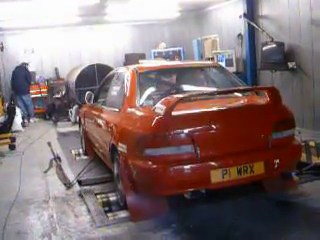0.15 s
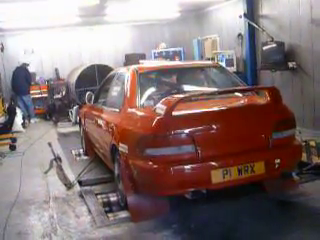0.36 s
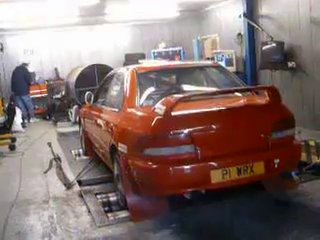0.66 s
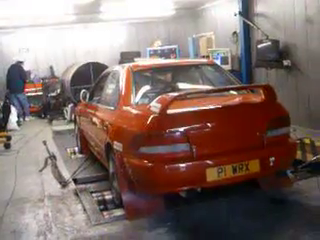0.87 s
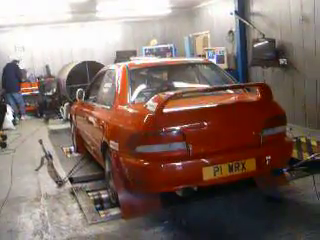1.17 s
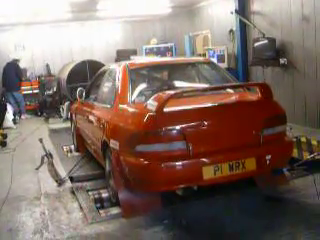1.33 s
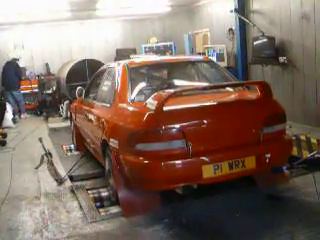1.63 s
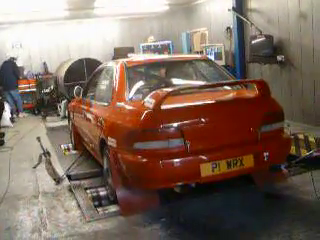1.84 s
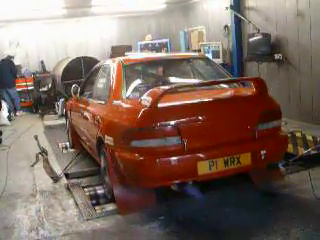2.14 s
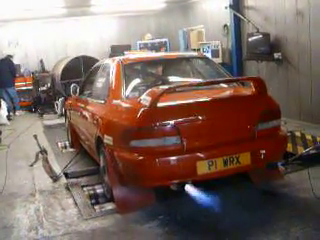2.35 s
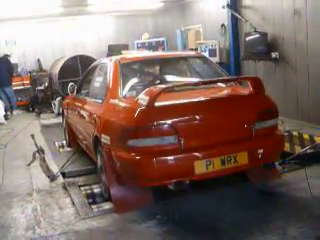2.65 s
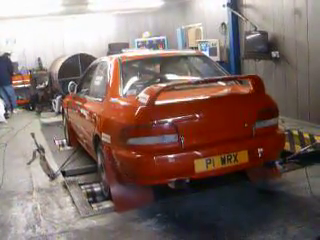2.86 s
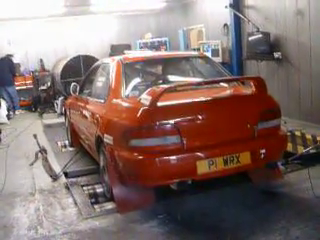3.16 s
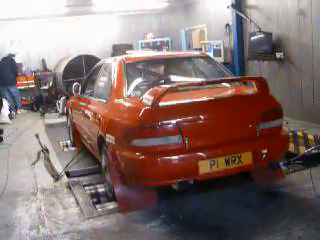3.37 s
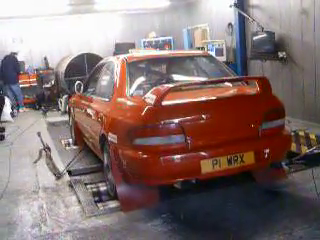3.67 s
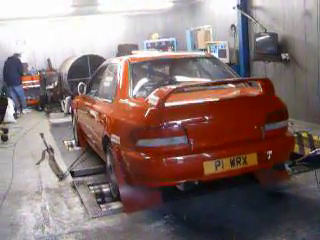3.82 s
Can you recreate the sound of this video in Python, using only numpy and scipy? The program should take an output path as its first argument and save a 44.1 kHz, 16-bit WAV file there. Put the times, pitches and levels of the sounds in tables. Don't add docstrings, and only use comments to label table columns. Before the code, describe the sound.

Car exhaust heard a few metres behind: a lumpy, raspy pull grows louder and higher, stops abruptly into loud backfires and low buffeting, then the engine picks up again over faint fan and roller hiss; small bass-light camera microphone.

```python
import sys
import numpy as np
from scipy import signal
from scipy.fft import rfft, irfft
from scipy.io import wavfile
from scipy.ndimage import uniform_filter1d

SR = 44100
rng = np.random.default_rng(int(sys.argv[2]) if len(sys.argv) > 2 else 0)


def persist_wave(psi):
    counts = np.round(np.clip(psi, -1, 1) * 32767).astype(np.int16)
    wavfile.write(sys.argv[1], SR, np.atleast_2d(counts).T)


def magnitude_from_level(level_db):
    exponent = np.asarray(level_db, float) / 20
    return 10 ** exponent


N = 176400


def curve(t, table, column=1):
    points = np.array(table).T
    return np.interp(t, points[0], points[column])


def band(x, hz, width):
    return signal.lfilter(*signal.iirpeak(hz, hz / width, fs=SR), x)


def double_band(x, hz, width):
    return band(band(x, hz, width), hz, width)


def bank(x, table):
    return sum(magnitude_from_level(db) * band(x, hz, width) for hz, width, db in table)


def band_pass(x, order, edges_hz):
    return signal.sosfilt(signal.butter(order, edges_hz, "band", fs=SR, output="sos"), x)


def unit(x):
    return x / np.sqrt(np.mean(x ** 2))


def colour(table):
    f = np.arange(N // 2 + 1) * SR / N + 1
    hz, db = np.array(table).T
    shape = magnitude_from_level(np.interp(np.log(f), np.log(hz), db))
    return unit(irfft(rfft(rng.standard_normal(N)) * shape, N))


def walk(rate):
    k = int(SR / rate)
    return unit(uniform_filter1d(uniform_filter1d(rng.standard_normal(N), k), k))


def clicks(at, size):
    out = np.zeros(N + 2)
    i = np.clip(at * SR, 0, N - 1)
    np.add.at(out, i.astype(int), size * (1 - i % 1))
    np.add.at(out, i.astype(int) + 1, size * (i % 1))
    return out[:N]


# (time [s], shut [0-1])
THROTTLE = [
    (1.84, 0),
    (1.88, 1),
    (3.14, 1),
    (3.2, 0),
]


def throttle_shut(t):
    return curve(t, THROTTLE)


# (time [s], engine cycles [1/s])
SPEED = [(0, 31.8), (.15, 31.6), (.3, 31.9), (1.1, 34.5), (1.66, 36.75), (1.76, 37.1), (1.85, 36.6),
         (2.3, 34.9), (3.2, 30.3), (3.45, 29.98), (3.6, 30.2), (4, 31.35)]
CYCLE_START = 1.638


def crank(t):
    speed = curve(t, SPEED)
    cycles = np.cumsum(speed) / SR
    return speed, 4 * (cycles - cycles[int(CYCLE_START * SR)] % 1)


# (full load [dB], late [ms], part load [dB], late [ms], gas rasp [dB])
CYLINDERS = [(4.5, -0.026, -1.5, -0.033, 6.5), (5, -0.386, 0.5, -0.64, -2), (-1, -0.824, -15, -0.42, -3.5),
             (4.7, 0.037, -4.5, 0.245, -1)]
# (level [dB], late [ms], gas rasp [dB])
EARLY = [(2.6, 0.035, -0.5), (3, -0.0011, 5.5), (3.5, -0.369, -6), (0, -0.78, -4)]
# [time [s], time [s]]
BOOST = [1.02, 1.2]
PART_LOAD_S = 2.0
SCATTER_DB, JITTER_MS = .8, .025


def firings(t, turns):
    k = np.arange(int(turns[-1]))
    jitter, scatter, rasp_scatter = rng.standard_normal((len(k), 3)).T
    at = np.interp(k, turns, t)
    part = at > PART_LOAD_S
    boost = np.interp(at, BOOST, [0, 1])
    c = (k + 2 * part) % 4
    full_db, full_ms, part_db, part_ms, rasp = np.array(CYLINDERS).T[:, c]
    early = np.array(EARLY).T[:, c]
    size_db, late_ms, rasp_db = (1 - boost) * early + boost * np.array([full_db, full_ms, rasp])
    at = at + (np.where(part, part_ms, late_ms) + JITTER_MS * jitter) / 1000
    size_db = np.where(part, part_db, size_db) + SCATTER_DB * scatter
    return at, size_db, rasp_db + 1.2 * rasp_scatter


# (frequency [Hz], width [Hz], level [dB])
PIPE = [(177, 96, -5), (221, 126, -21), (230, 49, -8), (289.6, 58.5, -6.5), (436, 25, -9), (556, 125, -6.5)]
TAIL_PIPE = [(754, 17, -7), (765.4, 43.2, 2), (821, 15, -16)]
# (frequency [Hz], width [Hz], level [dB], rise per cycle/s of speed [dB])
TAIL_BOX = [(1183.5, 62, -21.5, 0.9), (1358, 34, -18, -0.1), (1541, 144, -18, 0.2), (1578.6, 46, -17, -1.5),
            (1800, 214, -24, 1.2), (2295, 108, -20.5, 0.3), (2912, 110, -20, -2.2), (3247, 117, -18, -0.46)]
MID_SPEED = 33
PIPE_BAND_HZ, PART_PIPE_DB = [82, 830], -6.5


def exhaust_note(t, speed, pulses, sharp):
    into_pipe = pulses * magnitude_from_level(PART_PIPE_DB * (t > PART_LOAD_S))
    note = band_pass(bank(into_pipe, PIPE) + bank(sharp, TAIL_PIPE), 6, PIPE_BAND_HZ)
    for hz, width, db, rise in TAIL_BOX:
        note = note + magnitude_from_level(db + rise * (speed - MID_SPEED)) * double_band(sharp, hz, width)
    return unit(note)


# (frequency [Hz], level per Hz [dB])
GAS = [(500, 2), (900, 1), (1300, -19), (1580, 6.5), (2000, -18), (3150, 0), (4000, -22.5), (7800, -16),
       (10500, -24)]
# [low [Hz], high [Hz]]
REPEAT_BAND = [1300, 5000]
PUFF_LEAD_S, PUFF_SHARE, PUFF_DEPTH = .0014, .17, .6
REPEAT_DB, HISS_DB = -4, -3


def gas_rasp(t, at, rasp_db):
    valves = clicks(at - PUFF_LEAD_S, magnitude_from_level(rasp_db))
    noise = colour(GAS)
    u = np.arange(441) / 441 / PUFF_SHARE
    swell = u * np.exp(-2 * u)
    puff = signal.fftconvolve(valves, swell)[:N]
    repeat = signal.fftconvolve(valves, noise[:441] * swell)[:N]
    pulling = 1 - throttle_shut(t)
    depth = PUFF_DEPTH * pulling
    hiss = unit(noise * (1 - depth + depth * unit(puff)) * magnitude_from_level(.7 * walk(9)))
    return magnitude_from_level(HISS_DB) * hiss + magnitude_from_level(REPEAT_DB) * pulling * unit(band_pass(repeat, 2, REPEAT_BAND))


# (multiple of cycle rate, level over the firing [dB], lag [turns of the tone])
DRONE = [(5, -8.5, .05), (7, -18.5, .3), (8, -14, 0.64), (13, -22, 0.22), (17, -21, 0.72)]
DRONE_FROM_S, DRONE_RISE_S = 3.2, 0.047


def pull_drone(t, turns):
    tones = sum(magnitude_from_level(db) * np.sin(2 * np.pi * (order * turns / 4 - lag)) for order, db, lag in DRONE)
    return tones * np.clip((t - DRONE_FROM_S) / DRONE_RISE_S, 0, 1)


# (time [s], firing level [dB], blow-down sharpness [dB], gas level [dB])
LOAD = [(0, -26, 4, -24.5), (.13, -25, 2.2, -21.5), (.27, -21.5, 3.5, -20.5), (.7, -16, 3, -12),
        (1.18, -14.5, 1, -14), (1.4, -15.5, 0, -15), (1.8, -19, 4, -19), (1.843, -31.5, 13, -13.5),
        (1.872, -47.5, 10.5, -23.5), (1.98, -36.5, 5.5, -23.5), (2.2, -34, -5, -52), (2.56, -43, 10, -42),
        (2.68, -37.5, 8, -34), (3.12, -41.5, 7, -36), (3.16, -23, -7, -23), (3.27, -26.5, 3.5, -32.5),
        (3.65, -20.5, 3, -27), (4, -17.5, 0.7, -23.5)]
GAS_DB = -11.5


def engine(t):
    speed, turns = crank(t)
    at, size_db, rasp_db = firings(t, turns)
    pulses = clicks(at, magnitude_from_level(size_db))
    sharp = pulses * magnitude_from_level(curve(t, LOAD, 2))
    tone = exhaust_note(t, speed, pulses, sharp) + pull_drone(t, turns)
    gas = gas_rasp(t, at, rasp_db)
    return tone * magnitude_from_level(curve(t, LOAD, 1)) + gas * magnitude_from_level(GAS_DB + curve(t, LOAD, 3))


# (late [s], level [dB])
ECHOES = [(.0105, -23.5), (.0135, -29), (0.022, -23.5), (.031, -33.5)]
ROOM_T60_S, ROOM_DB, ROOM_HZ, ROOM_RISE_S = .14, -14, 5000, 0.0074


def room(x):
    u = np.arange(SR // 2) / SR
    late, db = np.array(ECHOES).T
    tail = signal.lfilter(*signal.butter(1, ROOM_HZ, fs=SR), rng.standard_normal(len(u)))
    tail = tail * magnitude_from_level(-60 * u / ROOM_T60_S) * np.clip(u / ROOM_RISE_S, 0, 1)
    response = magnitude_from_level(ROOM_DB) * tail / np.sqrt(np.sum(tail ** 2)) + clicks(late, magnitude_from_level(db))[:len(u)]
    return signal.fftconvolve(x, response)[:N]


def tones(t, table, wander_db):
    return sum(magnitude_from_level(db + wander_db * walk(15)) * np.sin(2 * np.pi * hz * t) for hz, db in table)


# (frequency [Hz], level per Hz [dB])
SHOP = [(30, 11), (90, -10), (140, -14), (400, -5), (900, -11), (1300, -18.5), (3300, -24), (9500, -28),
        (12000, -36)]
# (frequency [Hz], level [dB])
HUMS = [(5130, -64), (6316, -61), (9419, -63)]
# (frequency [Hz], level [dB])
OVERRUN_TONES = [(107, -37), (139, -40.5)]
SHOP_DB = -32


def shop(t):
    hums = tones(t, HUMS, 1.2) + tones(t, OVERRUN_TONES, 3) * throttle_shut(t)
    return magnitude_from_level(SHOP_DB + 1.8 * walk(8.8)) * colour(SHOP) + hums


# (time [s], thump [dB], ring [dB], crack [dB], crack centre [Hz])
BANGS = [(1.8012, -2, -10, -13, 1520), (1.838, 0.5, -1.5, -20, 1500), (2.0125, 8, 6, -5.5, 2620),
         (2.0334, -10, -23, -20, 3500), (2.043, -30, -31, -18, 3000), (2.1215, -2.5, -9.5, -15, 2280),
         (2.2203, -18, -22, -36, 1200), (2.2518, -11.5, -28, -42, 1200), (2.279, -10, -18, -27.5, 1800),
         (2.307, -4, -7.5, -21, 1300), (2.336, -11, -10, -23, 1500), (2.364, -1, -1.5, -9, 2230),
         (2.3749, 1.5, -7, -8, 1800), (2.4696, -1.5, -8, -12, 2250), (2.637, -18, -26, -30, 1700),
         (2.6954, -12.5, -14.5, -24, 1500), (2.7346, -13.5, -13, -15.5, 2900), (2.75, -8, -12, -17.5, 2500),
         (2.78, -15, -21, -29, 2000), (2.88, -11, -25, -21, 1410), (2.9044, -14, -17, -19, 4500),
         (2.992, -18, -29, -14, 4100), (3.065, -20, -23, -42, 1200), (3.1256, -1.5, 2.5, -1.5, 1820),
         (3.1568, -11, -32, -44, 1500)]
# (frequency [Hz], width [Hz], level [dB])
BANG_RING = [(523, 240, 0), (780, 77, 9.5), (1070, 200, -15), (1340, 190, -20), (1780, 170, -18)]
BANG_CRACK = [(1190, 250, 18), (1646, 340, 19), (2370, 250, 8.5), (2800, 240, 10.5), (3250, 100, 10),
              (4100, 130, -12), (7140, 1400, 3.5)]
PUSH_MS, PUSH_MS_PER_DB = 1.2, .004
PUSH_BEFORE, PUSH_AFTER = 0.48, 0.24
SPIT_S, SPIT_DB = .003, -12
CRACK_S, CRACK_SHARE = .006, 0.77
SNAP_S, SNAP_DB = 0.0019, 8.5


def bangs():
    out = np.zeros(N + 4096)
    u = np.arange(4096) / SR - SPIT_S
    decay = np.exp(-u / CRACK_S) + magnitude_from_level(SNAP_DB) * np.exp(-u / SNAP_S)
    shape = np.where(u > 0, decay, magnitude_from_level(SPIT_DB))
    for at, thump_db, ring_db, crack_db, hz in BANGS:
        v = u * 1000 / max(PUSH_MS + PUSH_MS_PER_DB * thump_db, .3)
        push = -np.exp(-(2 * v - 1) ** 2 * 1.5)
        push += PUSH_AFTER * np.exp(-(v - 1.5) ** 2 * 4)
        push += PUSH_BEFORE * np.exp(-(v + .6) ** 2 * 4)
        ring = bank(np.gradient(push), BANG_RING)
        crack = band(bank(rng.standard_normal(4096) * shape, BANG_CRACK), hz, CRACK_SHARE * hz)
        i = int((at - SPIT_S) * SR)
        out[i:i + 4096] += magnitude_from_level(thump_db) * push
        out[i:i + 4096] += magnitude_from_level(ring_db) * ring / abs(ring).max()
        out[i:i + 4096] += magnitude_from_level(crack_db) * crack / abs(crack).max()
    return out[:N]


# (time [s], length [ms], ring [dB], rasp [dB], rasp centre [Hz])
BURNS = [(1.812, 14, -14, -19, 3170), (2.029, 11.3, -31, -8, 2800), (2.131, 11.6, -43, -27, 2900),
         (2.385, 13, -17, -34, 2700), (2.426, 10, -29, -32, 2600), (2.478, 10.6, -25.5, -23, 3060),
         (2.543, 22, -24.5, -43, 3000), (2.56, 23, -23, -35.5, 3030), (2.633, 11.3, -26, -33.5, 3100),
         (2.692, 22, -31, -29, 2800), (2.735, 20, -11.5, -25, 3060), (2.778, 27, -26, -39, 2960),
         (2.875, 15.4, -15.5, -33, 3200), (2.903, 36, -17.5, -27, 3250), (2.991, 23, -22.5, -34, 3160),
         (3.136, 7.5, -40, -39, 2970), (3.153, 6.7, -27, -39, 3000), (3.166, 4.8, -30, -36, 3200),
         (3.175, 18, -19, -30, 3180), (3.2, 38, -20.5, -33, 3120), (3.1245, 9.4, -5.5, -10.5, 4100),
         (3.125, 8.4, -22, -9, 1800), (2.012, 7, -5, -14.5, 3860), (2.062, 6.8, -28, -36, 3600),
         (3.507, 15, -30, -36, 3180)]
BURN_RING_HZ, BURN_RING_WIDTH = 771, 133
RASP_SHARE, RASP_LOW_DB = .12, -5.5


def burns():
    out = np.zeros(N + 4096)
    u = np.arange(4096) / SR
    for at, ms, ring_db, rasp_db, hz in BURNS:
        v = u * 1000 / ms
        swell = np.where(v < 1, np.sin(np.pi * np.clip(v, 0, 1) ** .6), 0)
        fire = rng.standard_normal(4096) * swell
        ring = double_band(fire, BURN_RING_HZ, BURN_RING_WIDTH)
        rasp = band(fire, hz, RASP_SHARE * hz)
        rasp = rasp + magnitude_from_level(RASP_LOW_DB) * band(fire, hz / 2, RASP_SHARE * hz)
        i = int(at * SR)
        out[i:i + 4096] += magnitude_from_level(ring_db) * ring / abs(ring).max()
        out[i:i + 4096] += magnitude_from_level(rasp_db) * rasp / abs(rasp).max()
    return out[:N]


# (frequency [Hz], level per Hz [dB])
BUFFET = [(20, 40), (50, 13), (80, 3.5), (110, -10), (150, 7.5), (220, -6), (500, -54)]
BUFFET_DB = -6.5


def buffet(t):
    return magnitude_from_level(BUFFET_DB + 2 * walk(9.1)) * colour(BUFFET) * throttle_shut(t)


ENGINE_ROOM_DB = 1


def scene():
    t = np.arange(N) / SR
    run = engine(t)
    pops = bangs() + burns()
    returns = room(magnitude_from_level(ENGINE_ROOM_DB) * run + pops)
    return (run + pops + returns + shop(t) + buffet(t))[None]


def roll_off(x):
    return signal.sosfilt(signal.butter(12, 12160, fs=SR, output="sos"), x)


BASS_HZ, TOP_HZ, CLIP = 90, 11030, .71


def record(dry):
    x = signal.sosfilt(signal.butter(4, BASS_HZ, "high", fs=SR, output="sos"), dry)
    x = signal.sosfilt(signal.cheby1(10, .5, TOP_HZ, fs=SR, output="sos"), x)
    mix = np.clip(x, -CLIP, CLIP)
    return roll_off(mix)


dry = scene()
out = record(dry)
persist_wave(out)
```